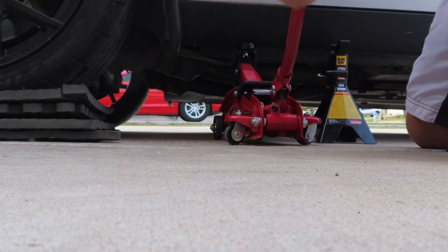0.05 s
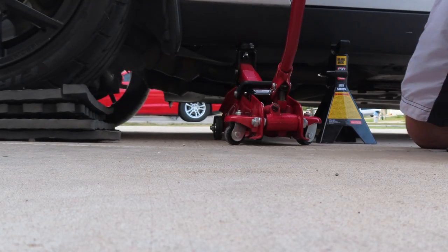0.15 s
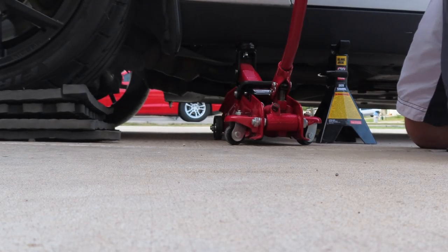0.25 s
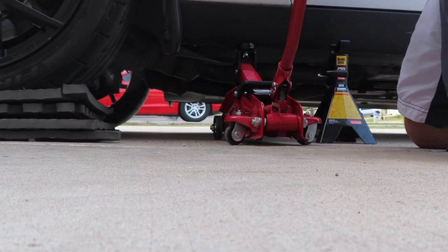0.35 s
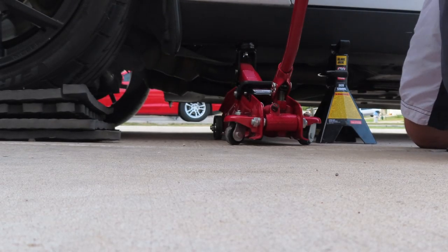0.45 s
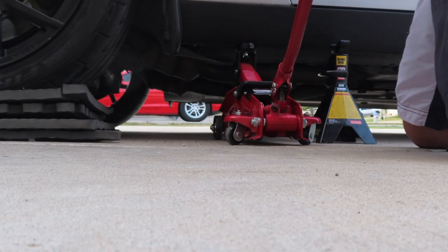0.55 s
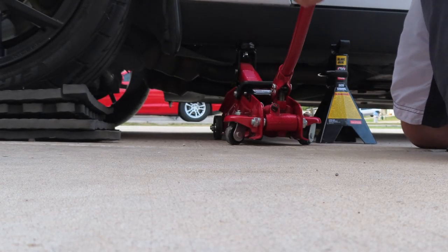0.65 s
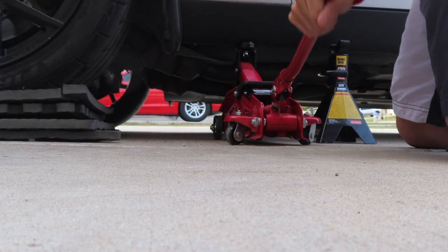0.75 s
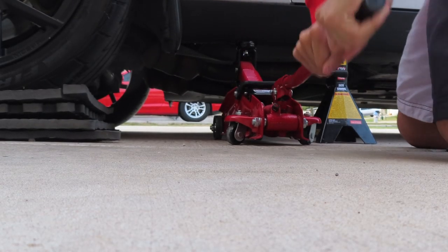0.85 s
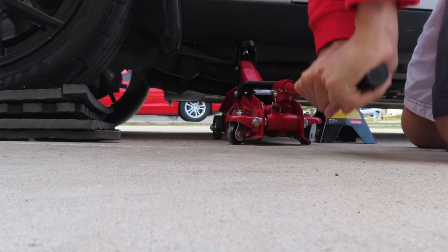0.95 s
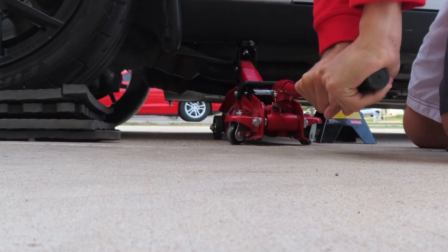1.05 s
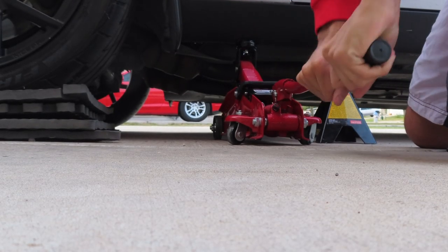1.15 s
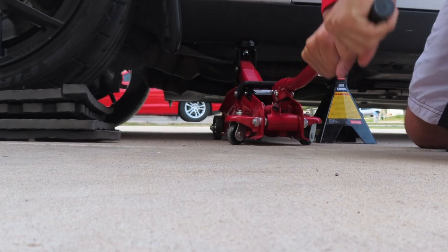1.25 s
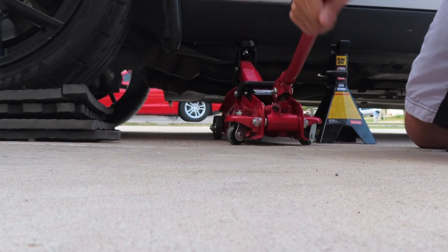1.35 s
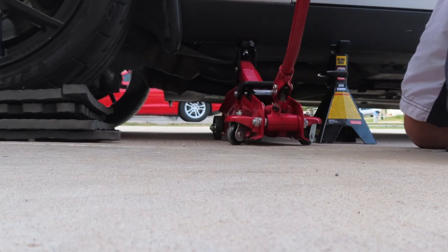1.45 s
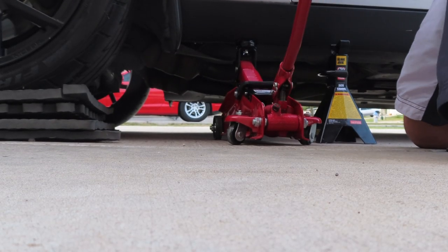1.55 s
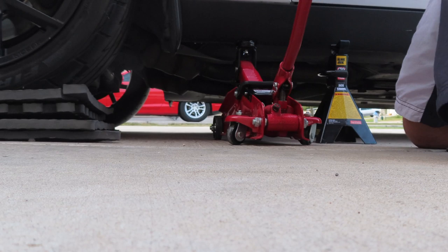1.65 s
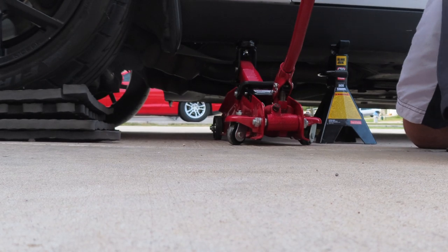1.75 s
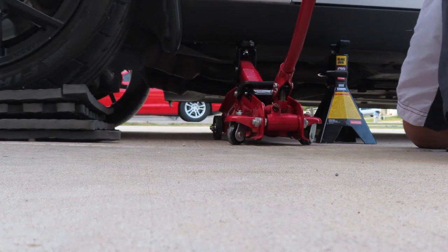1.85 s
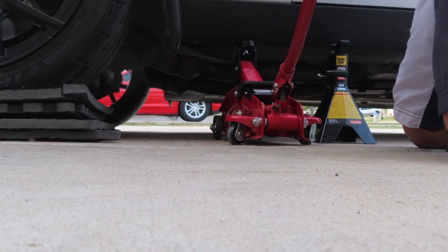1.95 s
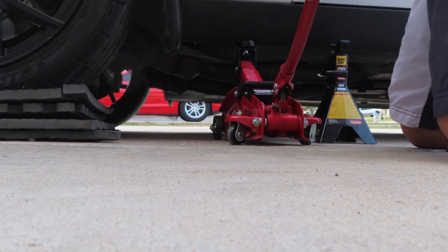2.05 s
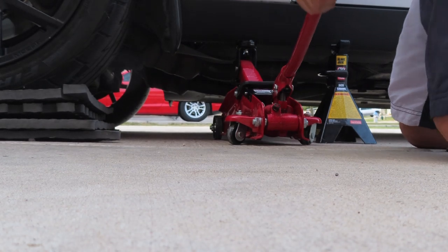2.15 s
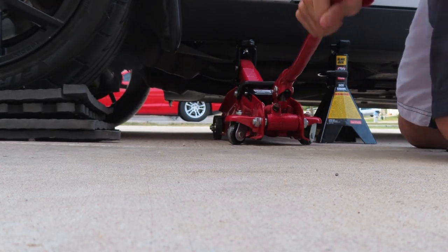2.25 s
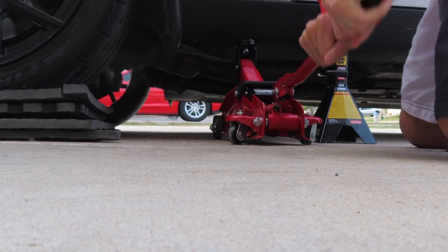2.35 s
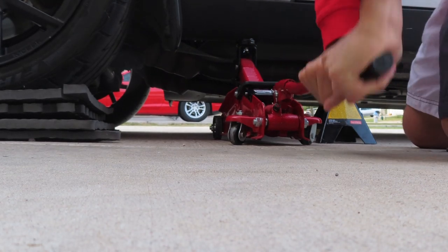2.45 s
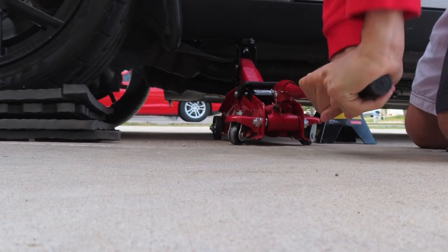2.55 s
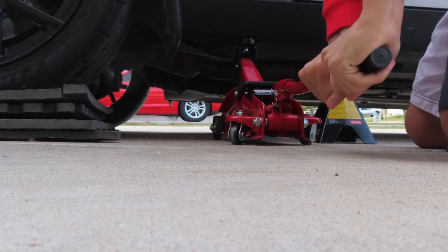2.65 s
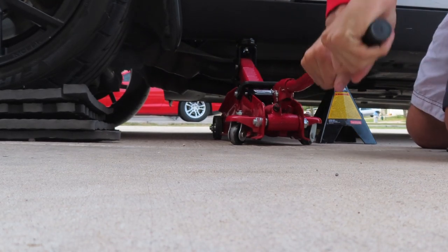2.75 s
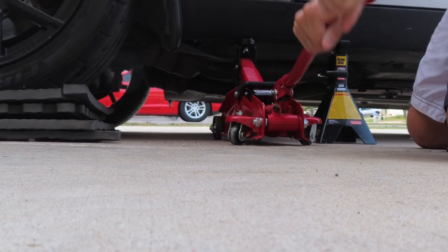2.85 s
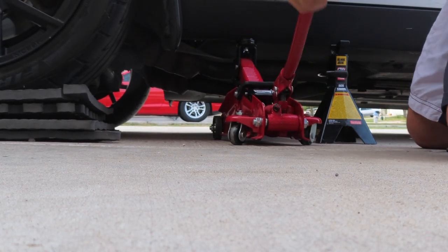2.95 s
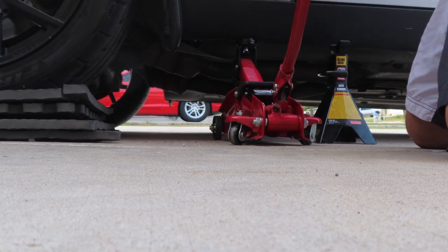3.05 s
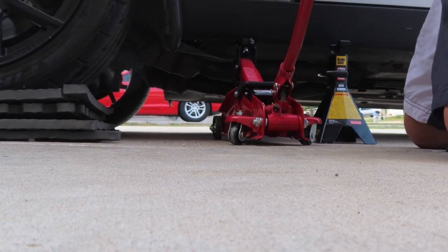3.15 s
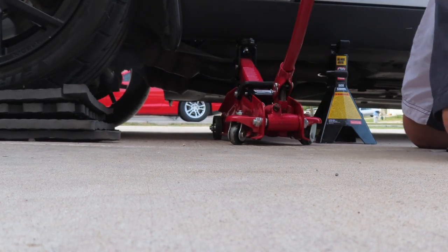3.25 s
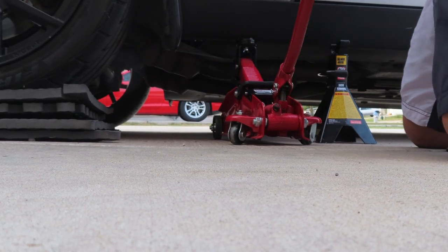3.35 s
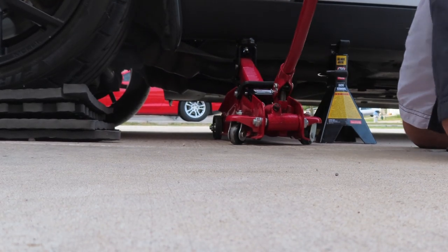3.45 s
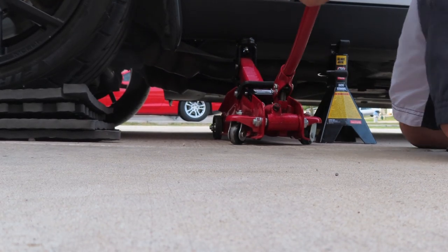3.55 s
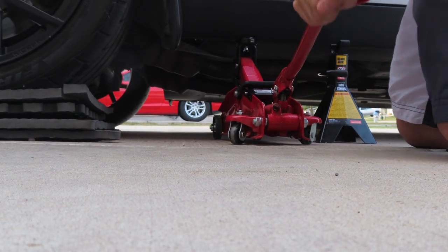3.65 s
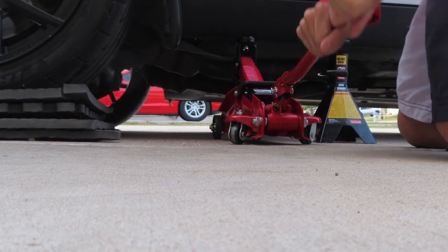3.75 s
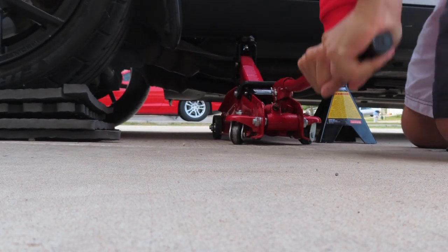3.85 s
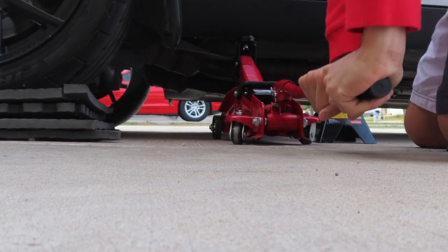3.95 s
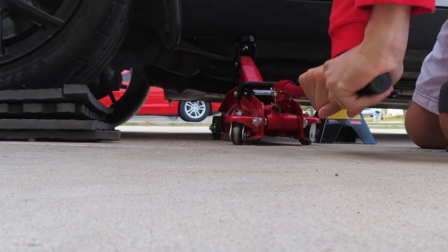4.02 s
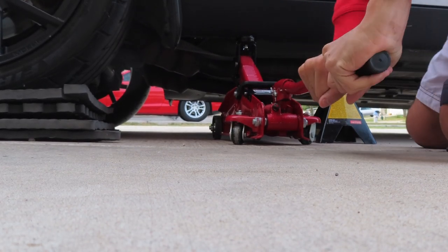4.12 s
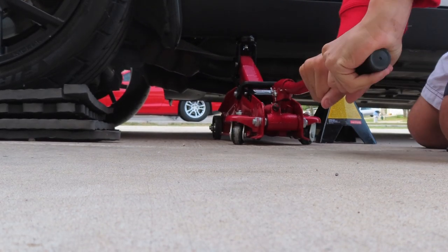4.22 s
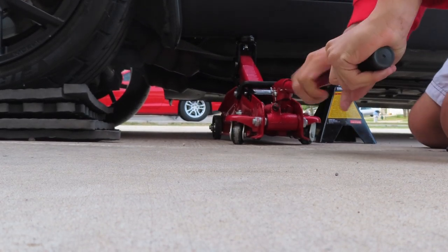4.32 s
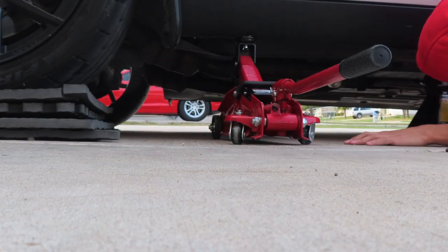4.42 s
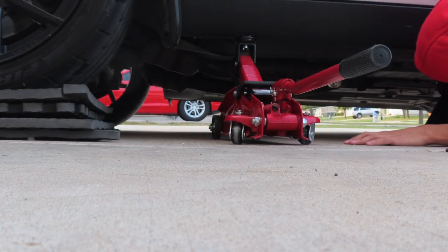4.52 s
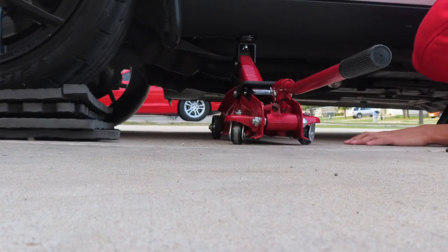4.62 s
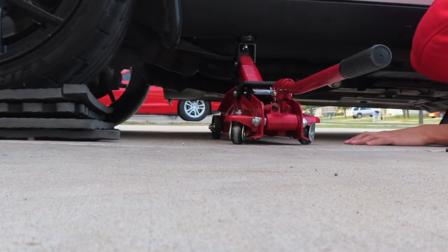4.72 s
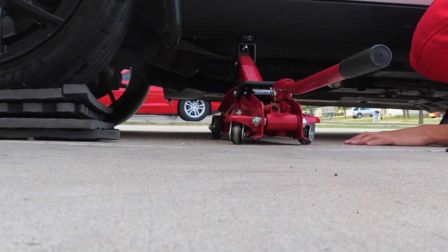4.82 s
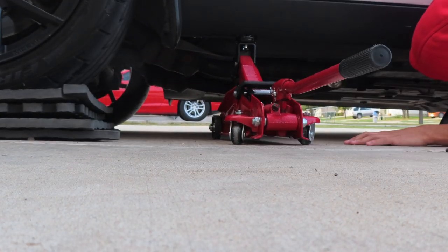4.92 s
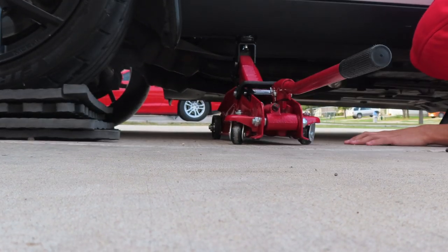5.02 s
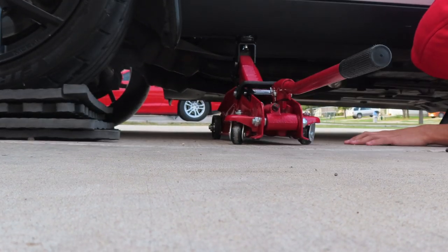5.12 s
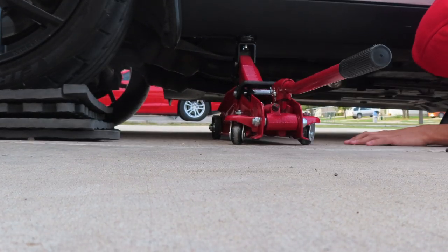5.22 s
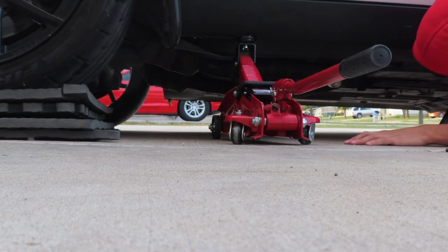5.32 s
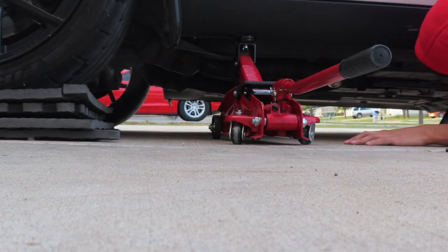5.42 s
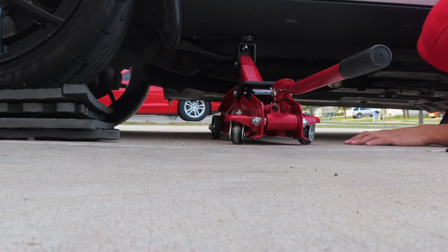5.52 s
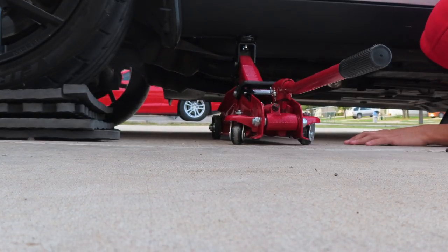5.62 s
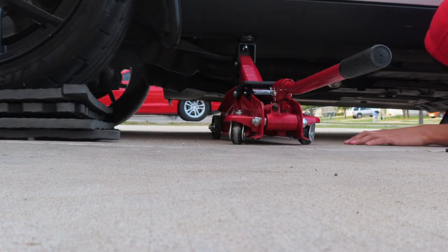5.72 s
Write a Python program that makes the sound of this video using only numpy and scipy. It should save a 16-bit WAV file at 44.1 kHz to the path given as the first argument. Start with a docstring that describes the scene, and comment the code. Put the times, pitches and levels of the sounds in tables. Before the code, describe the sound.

Wind buffets the microphone as a jack handle is pumped with dry clicks and clanks, crashes ringing, then a metal stand scrapes concrete.

```python
"""Floor jack at a windy garage

Two close capsules at an open garage: a hydraulic floor jack is pumped under a car while wind buffets them.
Dry pivots rub, tick and squeak as noise in clumps and sinking tones; linkage knocks and handle snaps are
bursts of tiny contacts. As the last stroke bottoms out, the steel handle crashes and its tube rings as modes.
Then the scene cuts, mid-ring, to a calmer moment, where a steel jack stand, grinding noise that drives its
plates, is shoved twice over the concrete. Light air and hiss are coloured noise; a far bird calls twice."""
import sys
import numpy as np
from scipy import signal
from scipy.fft import rfft, irfft, next_fast_len
from scipy.io import wavfile
from scipy.ndimage import uniform_filter1d

SR = 44100
rng = np.random.default_rng(int(sys.argv[2]) if len(sys.argv) > 2 else 0)


def dump(signal):
    """Clip the signal to [-1, 1] and save it as 16-bit WAV at the path in sys.argv[1]."""
    limited = np.clip(np.atleast_2d(signal).T, -1, 1)
    pcm = np.round(limited * 32767).astype(np.int16)
    wavfile.write(sys.argv[1], SR, pcm)


N = 254898
TIME = np.arange(N) / SR   # s

# All levels are relative: each source trims its own. Colours are spectra of which only the shape counts.
# strength of the wind at the microphone: start_s, level_db
WIND = [(0.0, -22.5), (0.38, -23.5), (0.4, -15.5), (1.18, -28), (1.51, -19.5), (1.55, -29), (2.01, -22.5),
        (2.99, -22), (3.01, -28), (3.35, -14), (3.49, -26), (3.57, -16), (3.61, -29), (3.88, -20),
        (4.06, -28), (4.16, -22.5), (4.2, -29), (4.38, -21)]
# spectrum of the buffeting: pitch_hz, level_db
WIND_COLOUR = [(15, -57.5), (25, -31.5), (112, -11), (216, -0.5), (431, -6.5), (554, -17.5), (603, -16),
               (1000, -32), (1400, -39), (1820, -67), (3080, -120)]
# the hardest eddies that thump on the microphone: centre_s, level_db, half_width_s
PUFFS = [(0.314, -19, 0.018), (0.41, -23.5, 0.0068), (0.546, -19, 0.012), (2.604, -15.5, 0.0094),
         (2.825, -19, 0.0083), (3.312, -16.5, .016), (3.416, -11.5, 0.017), (3.57, -15, 0.026),
         (4.139, -16.5, 0.033), (4.325, -14.5, 0.0077)]
# spectrum of those thumps: pitch_hz, level_db
PUFF_COLOUR = [(50, -25), (150, -15.5), (320, 5), (500, -2.5), (750, -12.5), (1100, -25.5), (1800, -43),
               (4000, -74.5)]
# outdoor hiss in the windy part, spectrum: pitch_hz, level_db
HISS = [(530, -26.5), (900, -2.5), (1000, -3), (1280, -6), (2040, -6.5), (3380, -12.5), (5550, -23.5),
        (12100, -25), (14500, -29.5), (16000, -43.5)]
# outdoor hiss in the calm part, spectrum: pitch_hz, level_db
STILL = [(180, -29), (300, -4), (398, -3), (3350, -22), (3640, -23.5), (3950, -24.5), (4300, -25),
         (15000, -44.5), (16000, -46)]
# level of the hiss in the calm part, which rises: start_s, level_db
STILL_LEVEL = [(4.9, -61.5), (5.686, -56), (5.78, -56.5)]
# the pivots rub while the handle moves: start_s, end_s, level_db
STROKES = [(0.0, 0.142, -46), (0.832, 1.068, -43.5), (1.177, 1.439, -42.5), (2.297, 2.593, -39.5),
           (2.711, 2.958, -47), (3.719, 3.995, -35)]
# loud knocks of pivot and linkage: start_s, level_db, treble_over_body_db, ring_hz
KNOCKS = [(0.0912, -22, -26, 2250), (0.4959, -11.5, -18, 2490), (0.5236, -9, -26.5, 1250),
          (0.9955, -22, -18, 3500), (1.028, -20.5, -23, 1480), (1.1685, -19, -25, 2200),
          (1.2454, -19.5, -12, 3560), (1.301, -14.5, -19.5, 2140), (1.3457, -22.5, -33, 2650),
          (1.8107, -20.5, -34, 1480), (1.8207, -11.5, -19, 2050), (2.353, -21.5, -17, 1980),
          (2.4787, -13.5, -20.5, 1980), (2.5479, -10.5, -24, 1460), (2.694, -19.5, -28, 2280),
          (2.8064, -16.5, -21.5, 1730), (2.8745, -24, -35, 1810), (2.9357, -18, -27, 1550),
          (3.3657, -12, -19, 3130), (3.5174, -24.5, -40, 1400), (3.785, -23.5, -13, 1920),
          (3.8349, -5.5, -20.5, 1980), (3.9006, -18.5, -37, 2047), (3.9338, -9, -26.5, 2050),
          (3.9719, -7, -17.5, 2650), (4.0414, -4, -26, 2160)]
# spectrum of a knock's dull body, also of the rubbing: pitch_hz, level_db
KNOCK_BODY = [(470, -44), (800, -11), (911, -11), (1130, -5.5), (1310, -8), (1490, -4.5), (1670, -11.5),
              (1960, -2.5), (2410, -9.5), (2730, -5), (3710, -14), (5000, -32.5), (6500, -60),
              (11000, -120)]
# spectrum of a knock's treble, also of the rubbing: pitch_hz, level_db
KNOCK_TREBLE = [(2820, -38), (4800, -5.5), (6020, 3.5), (6490, -1.5), (9770, -2), (10800, -4.5),
                (12400, -7), (13200, -11), (16000, -44)]
# the handle snaps in its socket: start_s, body_db, treble_db, ping_hz
SNAPS = [(0.4717, -12, -22, 6000), (0.8065, -14, -10.5, 8200), (2.209, -26.5, -34, 10000),
         (2.2239, -20.5, -21.5, 10500), (3.3395, -19.5, -22, 9360)]
# spectrum of a snap's body: pitch_hz, level_db
SNAP_BODY = [(530, -54), (900, -8.5), (1430, -5), (1870, -3.5), (2080, 0.5), (2350, -6.5), (3200, 0),
             (3700, -4.5), (4180, -13), (5000, -11), (6500, -45), (11000, -120)]
# spectrum of a snap's crack: pitch_hz, level_db
SNAP_TREBLE = [(2470, -41.5), (4200, -15.5), (5490, -10.5), (6010, 0.5), (7470, -3), (8130, -8), (8790, -7),
               (10200, -1.5), (13100, -9), (15600, -24.5), (16000, -38.5)]
# a dry pivot squeaks: start_s, length_s, starting_pitch_hz, level_db
SQUEAKS = [(1.238, 0.031, 1930, -34), (1.293, 0.047, 1860, -31), (2.468, 0.032, 2020, -34),
           (2.762, 0.047, 2170, -35)]
# the handle hits its stop and bounces: start_s, level_db
CLANGS = [(3.9885, -7), (3.9995, -13.5), (4.013, -17.5)]
# spectrum of those blows: pitch_hz, level_db
CLANG_COLOUR = [(410, -52), (700, -21.5), (1110, -12.5), (1200, -9.5), (1350, -16), (2250, -9.5),
                (2460, -11.5), (2760, -2.5), (3350, -11.5), (3850, -33.5), (8210, -23), (9580, -31),
                (10700, -26.5), (12700, -34), (15000, -84)]
# modes of the handle tube: pitch_hz, level_db, t60_s
TUBE = [(1744, -21, 1.0), (2040, -12, .9), (2186, -5, .8), (2308, -12, .9), (2325, -10, 1.2),
        (2554, -11, 1.2), (2600, -2, 1.2), (2665, 0, .25), (2687, -9, .8), (2778, -1, .9), (2838, -9, .6),
        (2970, -14, .8), (3023, -11, .8), (3133, -14, .8), (3245, -3, .3), (2268, 0, .35), (4075, -15, 1.4),
        (7950, -10, .13), (10400, -14, .13)]
# the crowd of weak modes between them, spectrum: pitch_hz, level_db
TUBE_CROWD = [(1000, -40), (1900, -10.5), (2700, -5), (3200, -3.5), (3700, -11.5), (4100, -4.5),
              (4400, -17.5), (4620, -14), (5000, -28), (9000, -50)]
# the stand is shoved twice: start_s, full_push_until_s, end_s, level_db
SHOVES = [(4.379, 4.513, 4.625, -24.5), (4.63, 4.648, 4.79, -29)]
# its feet catch on the concrete: start_s, level_db
BUMPS = [(4.46, -20.5), (4.507, -21), (4.60, -32), (4.6453, -19), (4.741, -36)]
# spectrum of the grinding feet: pitch_hz, level_db
DRAG_COLOUR = [(180, -36), (300, -9), (458, -12.5), (566, -5.5), (684, -11.5), (806, -1.5), (985, -7),
               (1080, -1.5), (1230, -14.5), (1470, -5.5), (1820, -12.5), (2090, -5.5), (2380, -11.5),
               (3050, -8), (5000, -30.5), (6500, -57), (11000, -120)]
# spectrum of the grit's rasp: pitch_hz, level_db
RASP_COLOUR = [(2290, -41), (3900, -5.5), (4390, -0.5), (4910, -17), (5320, -3.5), (6440, -8), (7130, -6.5),
               (10100, -9), (13100, -13.5), (15000, -30)]
# modes of the stand's plates: pitch_hz, level_db, t60_s
STAND = [(578, -5, .15), (648, -2, .15), (717, -6, .15), (815, -2, .12), (1104, -4, .36), (1420, -12, .12),
         (2040, -5, .12), (2675, -4, .1), (3090, -4, .1)]
# light air at the microphone in the calm part: start_s, level_db
BREEZE = [(4.8, -55), (4.892, -46), (5.422, -42.5), (5.446, -62.5), (5.664, -54.5), (5.78, -65)]
# spectrum of the light air: pitch_hz, level_db
BREEZE_COLOUR = [(15, -56), (25, -22), (123, -2), (184, -5), (216, -11), (249, -7), (397, -27), (600, -30),
                 (780, -56), (1320, -120)]
# a far bird in the calm part: start_s, length_s, starting_pitch_hz, level_db
CHIRPS = [(5.475, 0.064, 3420, -69), (5.66, .045, 3960, -64)]
# left-right difference of near sounds: pitch_hz, level_db
WIDTH = [(60, -49.5), (200, -46.5), (380, -25.5), (700, -17), (1300, -33.5), (2400, -39.5), (4400, -6.5),
         (8000, -9), (15000, 3)]
# left-right difference of sound from all around: pitch_hz, level_db
SURROUND = [(300, -28.5), (2400, -17.5), (4400, -0.5), (8000, -1), (15000, 6.5)]

CUT_S = 4.392   # the scene cuts here to the calm part
HISS_DB = -48.5
# play in the linkage ticks at random through every stroke
TICK_OVER_RUB_DB, TICK_SPREAD_DB, TICK_TREBLE_DB = 12.0, 3, -19.0
TICK_HZ, TICK_SPREAD_OCTAVES = 2045, 0.3
SQUEAK_SAG_HZ_PER_S, SQUEAK_JITTER_HZ = 4500.0, 45.0
# each shove takes hold, weakens and stops
SHOVE_ATTACK_S, SHOVE_SAG_DB_PER_S, SHOVE_RELEASE_S = 0.023, 96, 0.01
RASP_DB, RASP_SAG_DB_PER_S = -15.5, 93   # against the grit's full strength; fades more slowly
FULL_WEIGHT_S = 4.458   # the stand begins to settle on all its feet
CUTOFF_HZ = 16700


def from_db(db):
    """Decibels to gain."""
    return 10 ** (np.asarray(db) / 20)


def rms_one(x):
    """Scale to an rms of 1."""
    return x / np.sqrt(np.mean(x ** 2) + 1e-20)


def in_time(rows):
    """Columns of a time curve, read at every sample."""
    s, *columns = np.transpose(rows)
    return [np.interp(TIME, s, column) for column in columns]


def at_hz(points, hz):
    """Read a spectrum in dB on a log-frequency axis."""
    f, db = np.transpose(points)
    return np.interp(np.log(hz + 1), np.log(f + 1), db)


def convolve(x, response):
    """Causal convolution, cut to the length of x."""
    return signal.oaconvolve(x, response)[:len(x)]


def low_pass(x, hz, order):
    """Keep what lies below hz."""
    return signal.sosfilt(signal.butter(order, hz, fs=SR, output="sos"), x)


def high_pass(x, hz, order):
    """Keep what lies above hz."""
    return signal.sosfilt(signal.butter(order, hz, "high", fs=SR, output="sos"), x)


def response_of(spectrum, size=4096):
    """Minimum-phase impulse response with the given spectrum, by folding its cepstrum."""
    cepstrum = irfft(np.log(from_db(at_hz(spectrum, np.fft.rfftfreq(size, 1 / SR)))))
    cepstrum[1:size // 2] *= 2
    cepstrum[size // 2 + 1:] = 0
    return irfft(np.exp(rfft(cepstrum)))


def coloured(x, spectrum):
    """Colour x; white noise keeps its power."""
    response = response_of(spectrum)
    return convolve(x, response / np.linalg.norm(response))


def noise(spectrum):
    """Steady coloured noise, rms about 1."""
    return coloured(rng.standard_normal(N), spectrum)


def drift(rate_hz):
    """Slow chance with a spread of 1: noise through two equal poles, made at every 40th sample."""
    r = np.exp(-80 * np.pi * rate_hz / SR)
    slow = signal.lfilter([1], [1, -2 * r, r * r], rng.standard_normal(N // 40 + 2002))
    slow = slow[2000:]   # drop the run-in
    return np.interp(np.arange(N) / 40, np.arange(len(slow)), rms_one(slow))


def evened(x, span_s):
    """Hold the rms near 1 over spans of the given length."""
    power = uniform_filter1d(x ** 2, max(int(span_s * SR), 2)).clip(0)
    return x / np.sqrt(power + 1e-9)


def ring(force, hz, t60):
    """A resonance: a unit click sets a sine of height 1 ringing, down 60 dB after t60 seconds."""
    r, w = from_db(-60 / (t60 * SR)), 2 * np.pi * hz / SR
    return signal.lfilter([0, np.sin(w)], [1, -2 * r * np.cos(w), r * r], force + 1e-18)


def chatter(hits, rise_s, t60, first=0.0, size=8192):
    """Steel meets steel: a sharp first contact, then a dying burst of tiny ones; rows are start_s, level_db."""
    out, t = np.zeros(N + size), np.arange(size) / SR
    shape = (1 - np.exp(-t / rise_s)) * from_db(-60 * t / t60)
    for (s, db), contacts in zip(hits, rng.standard_normal((len(hits), size))):
        at = round(s * SR)
        out[at:at + size] += from_db(db) * shape * contacts
        out[at] += from_db(db) * first
    return out[:N]


def steely(x, t60, share, count=48, size=4096):
    """Many uneven high modes of a steel part replace a share of the treble's power, at half its strength."""
    t = np.arange(size) / SR
    hz = np.linspace(4500, 14500, count) + rng.uniform(-100, 100, count)
    strength, phase = rng.rayleigh(1, (count, 1)), rng.uniform(0, 2 * np.pi, (count, 1))
    modes = np.sum(strength * np.sin(2 * np.pi * hz[:, None] * t + phase), axis=0)
    modes = modes * from_db(-60 * t / t60)
    share = np.clip(share, 0, 1)
    ringing = convolve(x, modes / np.linalg.norm(modes))
    return np.sqrt(1 - share) * x + np.sqrt(share / 2) * ringing


def whistle(rows, sag_hz_per_s, jitter_hz):
    """Short unsteady tones that swell, sink in pitch and fade; rows are start_s, length_s, pitch_hz, level_db."""
    out, jitter = np.zeros(N), jitter_hz * drift(150)
    for s, length, hz, db in rows:
        inside = (TIME > s) & (TIME < s + length)
        t = TIME[inside] - s
        phase = 2 * np.pi * np.cumsum(hz - sag_hz_per_s * t + jitter[inside]) / SR
        swell = np.sin(np.pi * t / length)
        out[inside] += from_db(db) * swell * np.sqrt(2) * np.sin(phase)
    return out


def wind(edge_hz=600, edge_db=-22.0, body_db=0.08, flutter_db=3.0, brightening=0.38, usual_db=-22.0):
    """Eddies thump on the microphone; strong ones carry relatively more above edge_hz."""
    level_db = in_time(WIND)[0] + flutter_db * drift(31)
    eddies = low_pass(noise(WIND_COLOUR), edge_hz, 4)
    fast = high_pass(noise(WIND_COLOUR), edge_hz, 4)
    buffet = evened(eddies, 0.033) * from_db(level_db + body_db)
    edge_level_db = level_db + edge_db + brightening * (level_db - usual_db)
    edge = evened(fast, 0.028) * from_db(edge_level_db)
    swell = sum(from_db(db) * np.exp(-((TIME - s) / width) ** 2) for s, db, width in PUFFS)
    return buffet + edge + swell * evened(noise(PUFF_COLOUR), 0.015)


def outdoors(windy):
    """Hiss from all around, much quieter in the calm part."""
    in_wind = from_db(HISS_DB) * noise(HISS)
    in_calm = from_db(in_time(STILL_LEVEL)[0]) * noise(STILL)
    return windy * in_wind + (1 - windy) * in_calm


def rubbing(grain_db=7.5, treble_db=-15.5, creak_db=2.5):
    """Dry pivots stick and slip in clumps through each stroke, loudest in mid-swing."""
    motion = np.zeros(N)
    for start, end, db in STROKES:
        arch = 4 * (TIME - start) * (end - TIME) / (end - start) ** 2
        motion += from_db(db) * np.sqrt(np.clip(arch, 0, 1))
    clumps_db = grain_db * drift(70) + creak_db * drift(300)
    slips = motion * evened(rng.standard_normal(N) * from_db(clumps_db), 0.3)
    return coloured(slips, KNOCK_BODY) + from_db(treble_db) * coloured(slips, KNOCK_TREBLE)


def ticks(count=8):
    """Small knocks scattered through each stroke, louder when the pivots rub harder; rows like KNOCKS."""
    rows = []
    for start, end, rub_db in STROKES:
        s = start + (end - start) * (np.arange(count) + rng.random(count)) / count
        size, hardness, pitch = rng.standard_normal((3, count))
        level_db = rub_db + TICK_OVER_RUB_DB + TICK_SPREAD_DB * size
        treble_db = TICK_TREBLE_DB + TICK_SPREAD_DB * hardness
        hz = TICK_HZ * 2 ** (TICK_SPREAD_OCTAVES * pitch)
        rows.append(np.c_[np.maximum(s, 0), level_db, treble_db, hz])
    return np.vstack(rows)


def linkage(body_db=-7.5, treble_db=-2.0, ring_db=-25.0, size=2048):
    """Dull knocks of the pivots; each sets the frame ringing briefly at a pitch of its own."""
    knocks = np.vstack([KNOCKS, ticks()])
    s, level_db, bright_db, _ = knocks.T
    body = chatter(np.c_[s, level_db + body_db], rise_s=0.0014, t60=0.059, first=2.4)
    treble = chatter(np.c_[s, level_db + bright_db + treble_db], rise_s=0.00074, t60=0.046, first=2.6)
    rings, rebounds = np.zeros(N), np.exp(-np.arange(size) / SR / 0.0062)
    for at, db, _, hz in knocks:
        start = round(at * SR)
        force = rebounds * rng.standard_normal(size)
        rings[start:start + size] += from_db(db + ring_db) * ring(force, hz, 0.014)
    treble = steely(coloured(treble, KNOCK_TREBLE), t60=0.025, share=0.6)
    return coloured(body, KNOCK_BODY) + treble + rings


def socket(ping_db=-16.0, ping_t60=0.016, crack_db=1.5):
    """The loaded handle slips in its socket: a hard crack with a short ping."""
    s, body_db, treble_db, _ = np.transpose(SNAPS)
    body = chatter(np.c_[s, body_db], rise_s=0.0002, t60=0.081, first=3.6)
    crack = chatter(np.c_[s, treble_db + crack_db], rise_s=0.00022, t60=0.046, first=2.6)
    crack = steely(coloured(crack, SNAP_TREBLE), t60=0.02, share=0.4)
    pings = np.zeros(N)
    for at, _, db, hz in SNAPS:
        force = chatter([(at, db + ping_db)], rise_s=0.0003, t60=0.046)
        pings += ring(force, hz, ping_t60)
    return coloured(body, SNAP_BODY) + crack + pings


def squeaks(rough_db=3.5):
    """Stick and slip turns almost regular for a moment; the pitch sinks as the pivot slows."""
    roughness = rms_one(from_db(rough_db * drift(300)))
    return whistle(SQUEAKS, SQUEAK_SAG_HZ_PER_S, SQUEAK_JITTER_HZ) * roughness


def crash(shimmer_db=-4.0):
    """The handle rattles against its stop and its high modes shimmer."""
    blows = coloured(chatter(CLANGS, rise_s=0.0017, t60=0.14), CLANG_COLOUR)
    return blows + from_db(shimmer_db) * steely(blows, t60=0.12, share=1)


def tube(waver_db=1.6, crowd_db=-29.5, crowd_t60=0.94, modes_db=-20.5):
    """The handle tube rings on in decaying modes over a crowd of weak ones, wavering in the hand."""
    blow_s = CLANGS[0][0]
    since = TIME - blow_s
    crowd_level_db = crowd_db - 60 * np.abs(since) / crowd_t60
    out = (since > 0) * from_db(crowd_level_db) * noise(TUBE_CROWD)
    for (hz, db, t60), late_s in zip(TUBE, rng.uniform(0, 0.0037, len(TUBE))):
        blow = signal.unit_impulse(N, round((blow_s + late_s) * SR))
        out += from_db(db + modes_db + waver_db * drift(25)) * ring(blow, hz, t60)
    return out


def shoving(sag_db_per_s):
    """Gain of the stand's sliding: attack, full push, a steady sag, release."""
    gain = np.zeros(N)
    for start, eased, end, db in SHOVES:
        push = from_db(db - sag_db_per_s * np.maximum(TIME - eased, 0))
        attack = np.clip((TIME - start) / SHOVE_ATTACK_S, 0, 1)
        release = np.clip((end - TIME) / SHOVE_RELEASE_S, 0, 1)
        gain += push * attack * release
    return gain


def stand(grit_db=3.0, grind_db=-1.0, split_hz=900, weight_db=2.0, plates_db=-36.0, judder_db=1.8, tilted_db=-18.0):
    """Grit crunches under juddering feet and sets the plates ringing; the lows come in with the weight."""
    crunch = evened(rng.standard_normal(N) * from_db(grit_db * drift(132)), 0.0241)
    grit = crunch * from_db(judder_db * drift(28))
    grind = grit * shoving(SHOVE_SAG_DB_PER_S)
    bumps = chatter(BUMPS, rise_s=0.00031, t60=0.065, first=2.5)
    plates = sum(from_db(db + plates_db) * ring(grind + bumps, hz, t60) for hz, db, t60 in STAND)
    rasp = grit * from_db(RASP_DB) * shoving(RASP_SAG_DB_PER_S) + from_db(-15.5) * bumps
    rasp = steely(coloured(rasp, RASP_COLOUR), t60=0.05, share=0.6)
    body = coloured(from_db(grind_db) * grind + bumps, DRAG_COLOUR) + plates
    low = low_pass(body, split_hz, 3)
    high = high_pass(body, split_hz, 3)
    weight = np.clip((TIME - FULL_WEIGHT_S) / 0.003, from_db(tilted_db), 1)   # tilted until it settles
    return high + from_db(weight_db) * weight * low + rasp


def light_air(flutter_db=3.0):
    """Light air stirs at the microphone in soft lumps."""
    lumps = rms_one(from_db(flutter_db * drift(13)))
    return from_db(in_time(BREEZE)[0]) * lumps * evened(noise(BREEZE_COLOUR), 0.092)


def bird():
    """Two thin notes from far away, each sinking slightly."""
    return whistle(CHIRPS, sag_hz_per_s=680.0, jitter_hz=30.0)


def garage(x, wet_gain=from_db(-9.0) / 2, low_t60=0.31, high_t60=0.16, split_hz=4500, size=22050):
    """Dense echoes between floor, car and walls, as decaying noise; the treble dies first."""
    t = np.arange(size) / SR
    low = low_pass(rng.standard_normal(size), split_hz, 2)
    high = high_pass(rng.standard_normal(size), split_hz, 2)
    tail = low * from_db(-60 * t / low_t60) + high * from_db(-60 * t / high_t60) / 2
    tail = tail * (1 - np.exp(-t / 0.0019))   # echoes build up over about 2 ms
    return wet_gain * convolve(x, tail / np.linalg.norm(tail))


def microphones(near, far, far_other):
    """Two close capsules hear nearly the same bass; near treble differs in phase, far treble is unrelated."""
    size = next_fast_len(N)
    hz = np.fft.rfftfreq(size, 1 / SR)
    near_side = -1j * rfft(near, size) * from_db(at_hz(WIDTH, hz))   # a quarter turn of phase
    far_side = rfft(far_other, size) * from_db(at_hz(SURROUND, hz))
    side = irfft(near_side + far_side, size)[:N]
    return np.array([near + far + side, near + far - side])


def scene():
    """Pumping in the wind, then a hard cut to the stand in the calm; the cut ends the handle's ring."""
    windy = np.clip((CUT_S - TIME) / 0.0065, 0, 1)
    steel = linkage() + rubbing() + squeaks() + socket() + crash() + stand()
    near = steel + windy * (wind() + tube()) + (1 - windy) * (light_air() + bird())
    far = garage(steel) + outdoors(windy)
    far_other = garage(steel) + outdoors(windy)   # fresh chance, unrelated to far
    return microphones(near, far, far_other)


def record(dry):
    """The loudest peaks are flattened smoothly, then the deepest bass and the top are cut."""
    held = dry / (1 + dry ** 8) ** (1 / 8)
    top_cut = signal.cheby2(14, 60, CUTOFF_HZ, fs=SR, output="sos")   # 60 dB down from CUTOFF_HZ up
    return signal.sosfilt(top_cut, high_pass(held, 32, 2))


dry = scene()
out = record(dry)
dump(out)
```